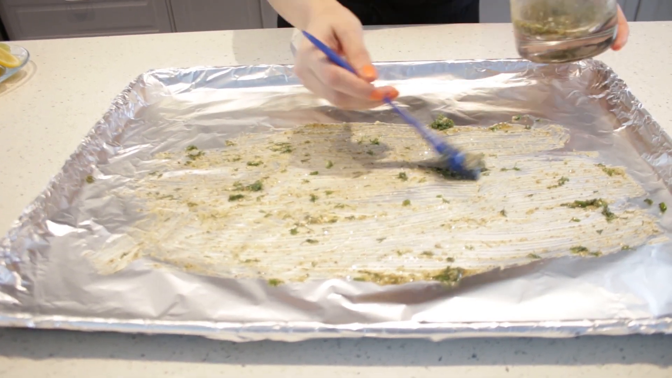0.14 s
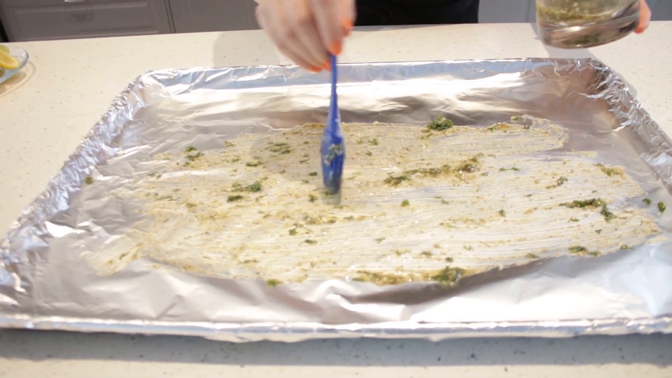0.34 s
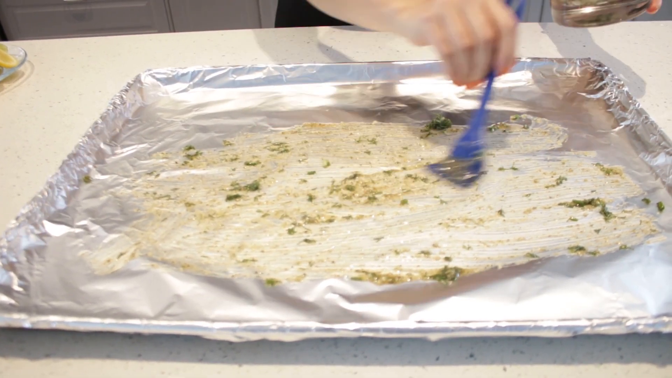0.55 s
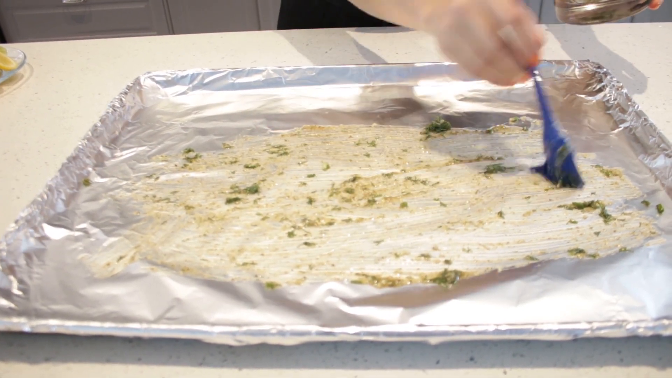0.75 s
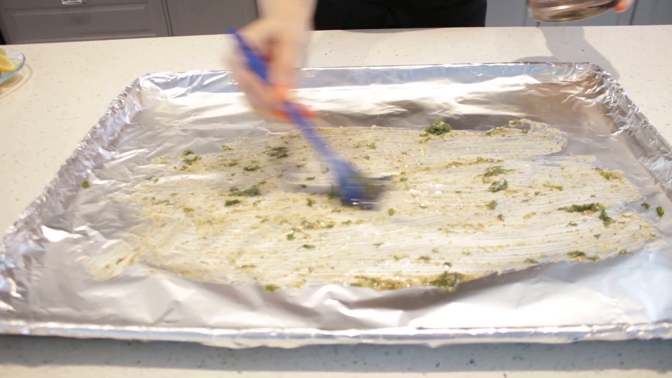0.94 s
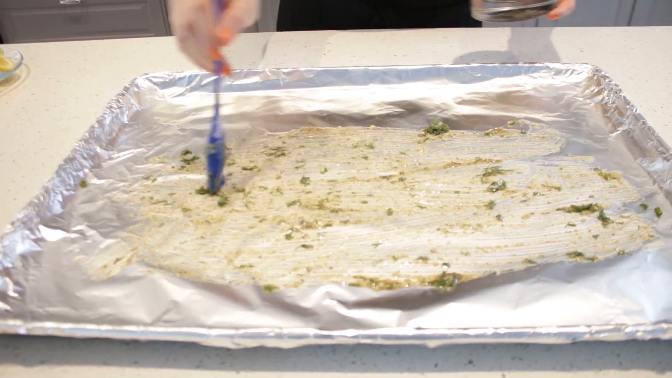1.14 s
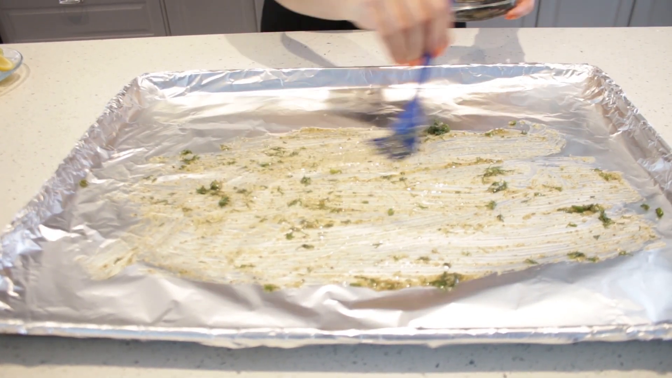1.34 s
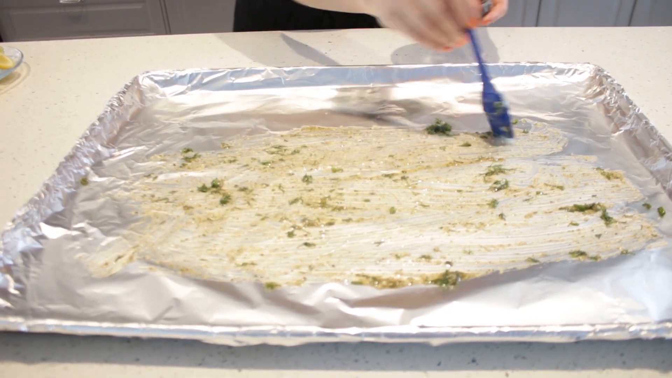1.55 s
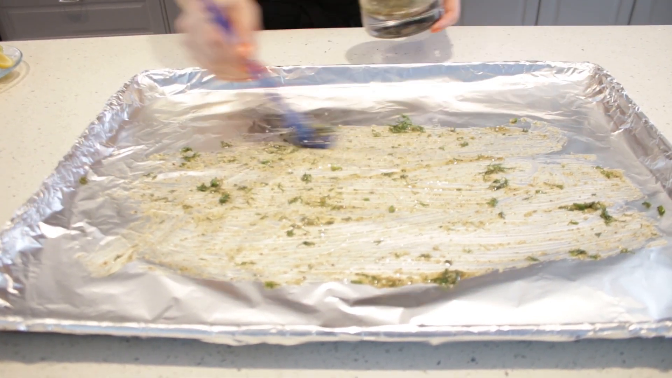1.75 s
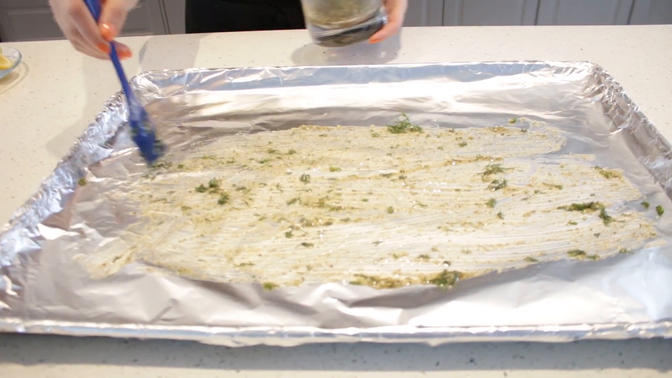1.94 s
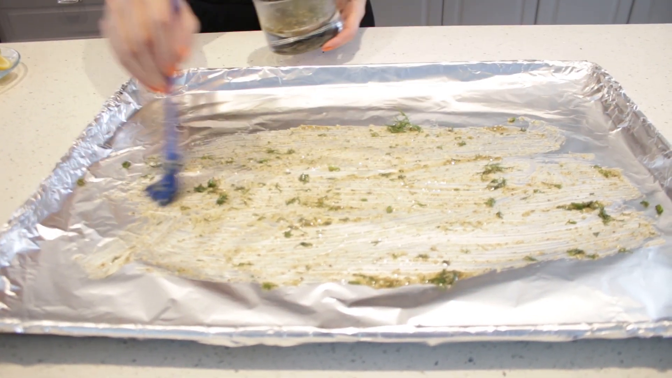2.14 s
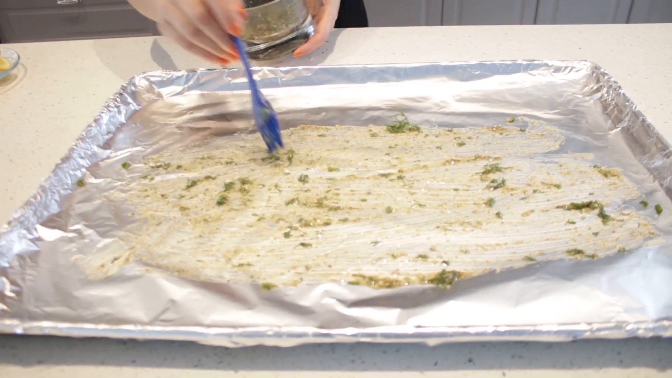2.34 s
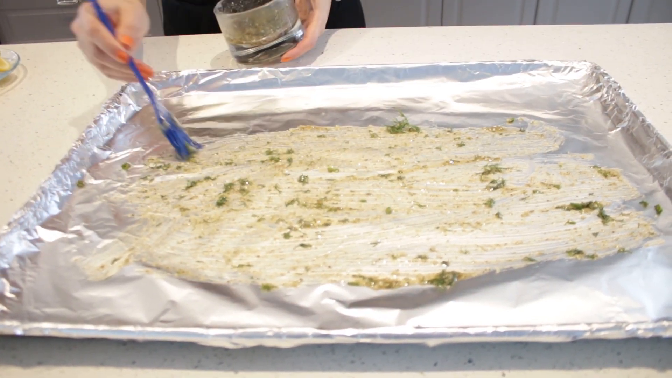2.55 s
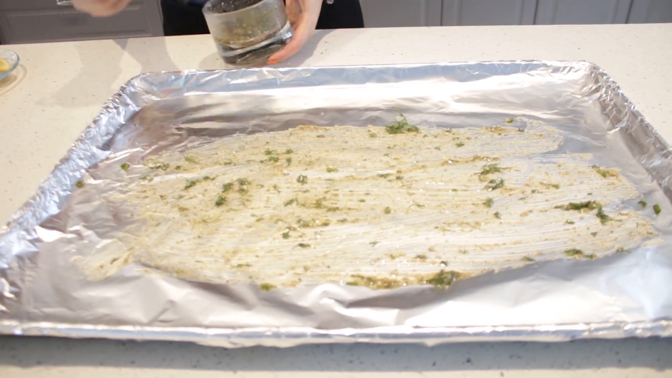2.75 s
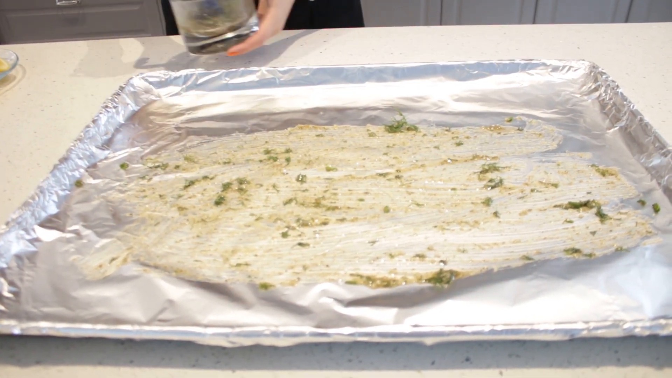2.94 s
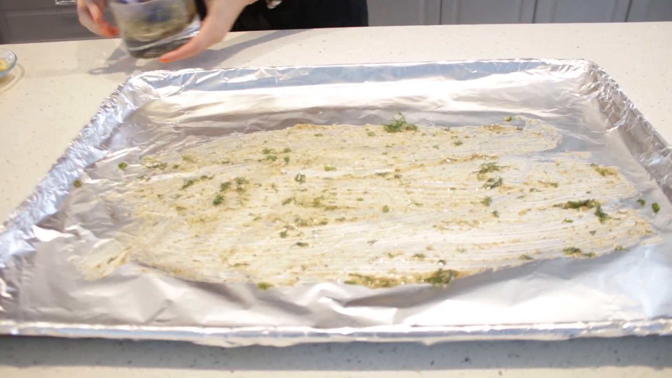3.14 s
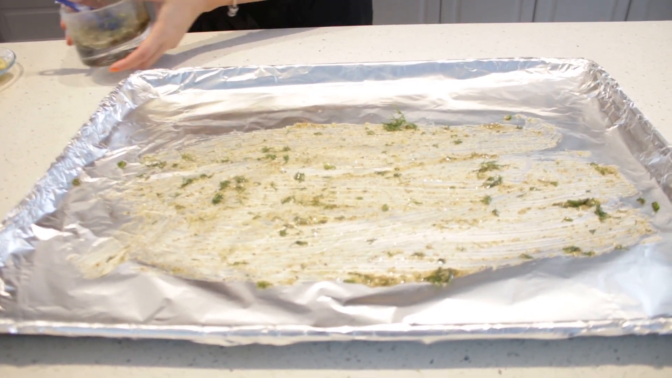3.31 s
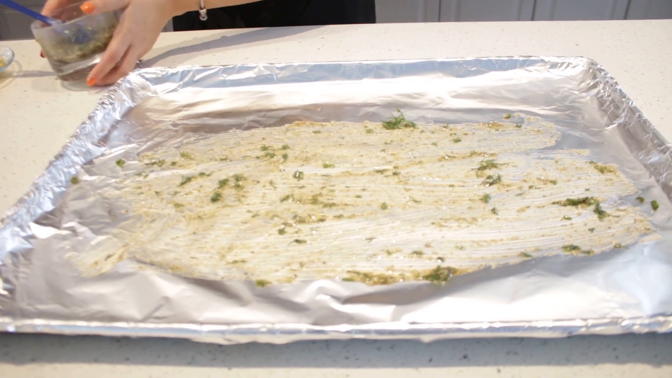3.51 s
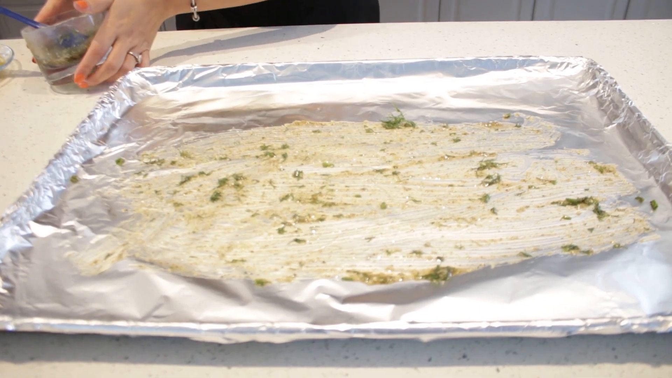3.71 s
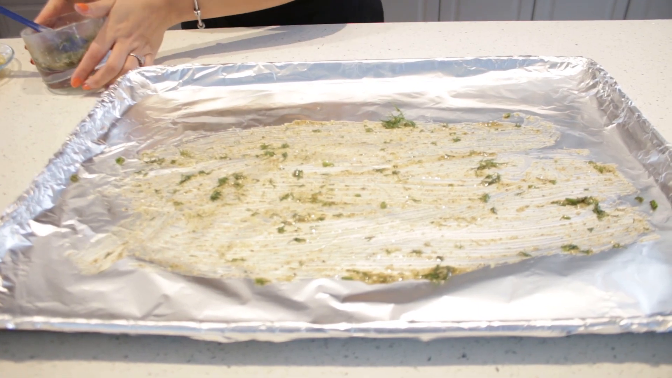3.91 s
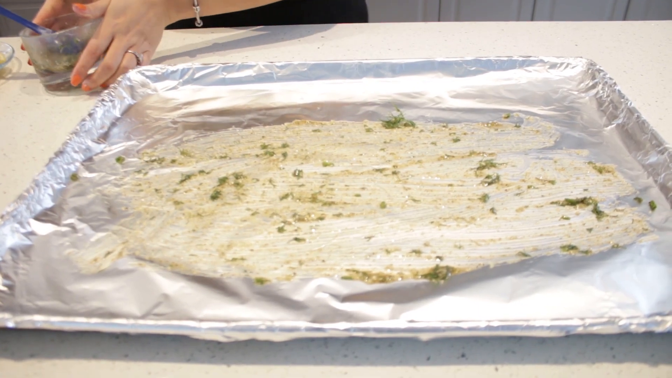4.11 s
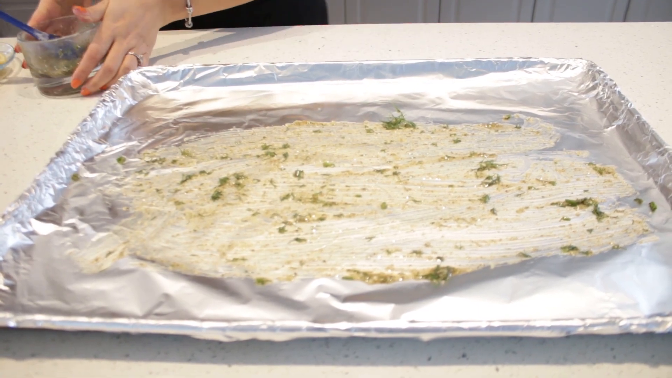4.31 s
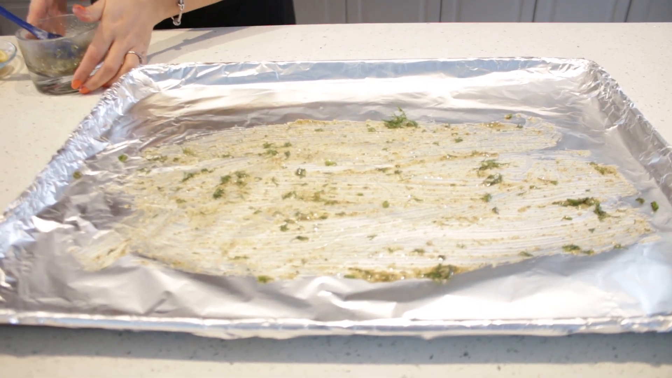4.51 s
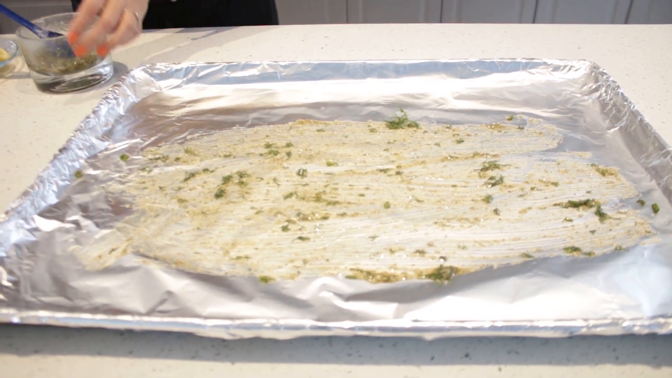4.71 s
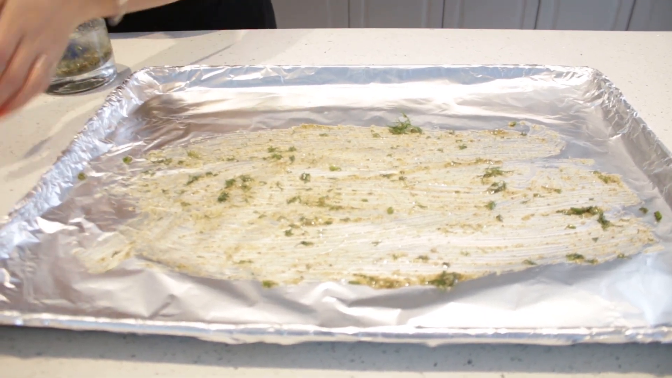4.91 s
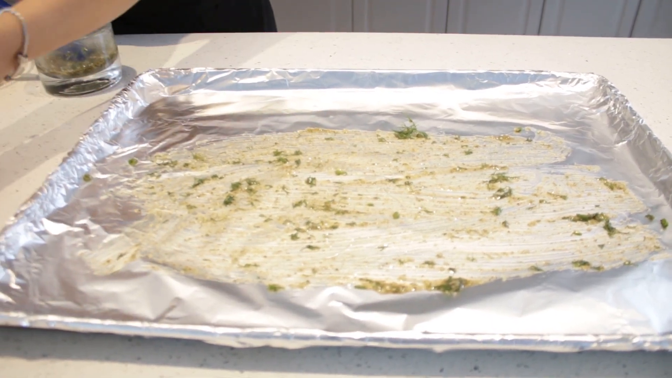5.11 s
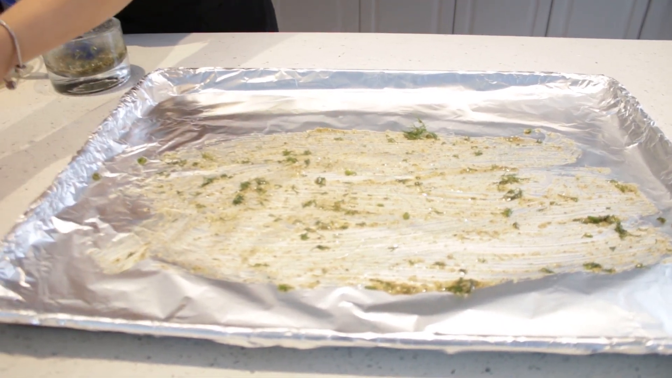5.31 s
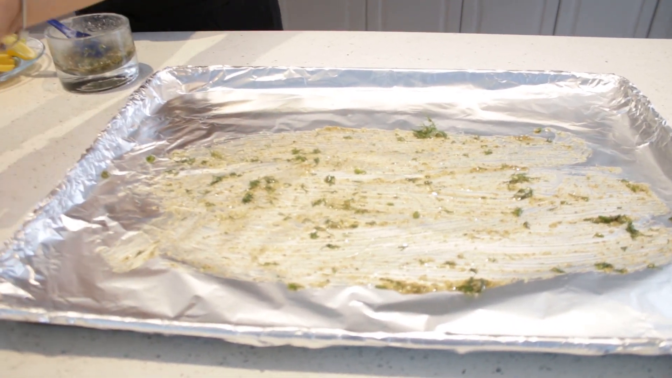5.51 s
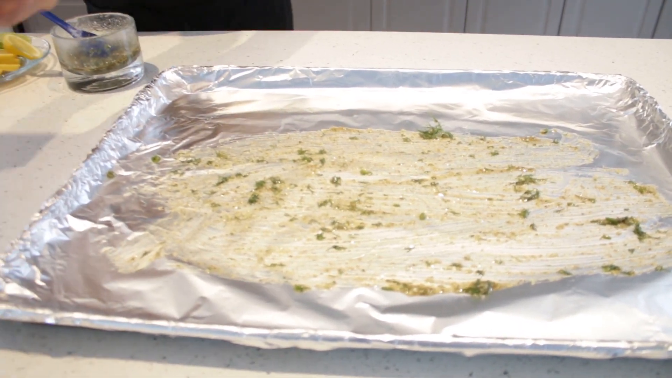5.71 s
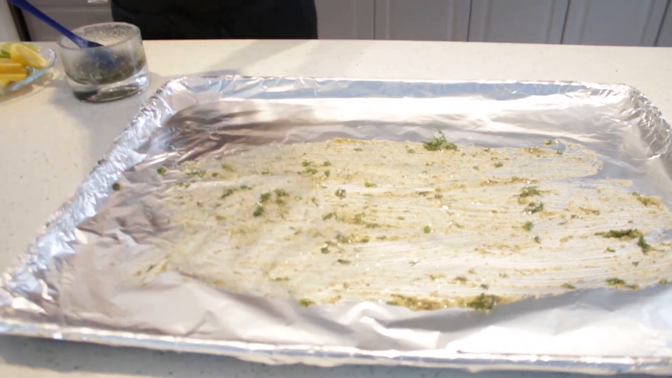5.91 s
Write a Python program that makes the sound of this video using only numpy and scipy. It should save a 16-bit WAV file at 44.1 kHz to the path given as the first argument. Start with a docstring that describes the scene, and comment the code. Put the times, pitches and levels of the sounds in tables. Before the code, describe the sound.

In a fan-filled kitchen, short crackly foil strokes give way to hard glass thuds on a counter, then small rustles and clicks.

```python
"""A fan hums in a fairly live kitchen throughout: filtered noise and wavering tones.
First a silicone brush spreads melted butter over foil on a baking sheet. Grainy noise makes the wet
hiss, short bursts make the crackling creases, and resonant filters make the sheet hum.
Then the butter glass shifts and is set on the counter, and the brush is dropped into it: thuds and ringing modes.
Last, a hand rustles and clicks at a dish beside it, and a few late foil creases settle."""
import sys
import numpy as np
from scipy import signal
from scipy.fft import rfft, irfft
from scipy.io import wavfile

SR = 44100
rng = np.random.default_rng(int(sys.argv[2]) if len(sys.argv) > 2 else 0)


def unload_audio(sound):
    """Save the sound as a 16-bit wav file, at the path given as the first command line argument."""
    columns = np.transpose(np.atleast_2d(sound))
    # keep every value between -1 and 1, then stretch to whole-number steps
    steps = np.round(np.clip(columns, -1, 1) * 32767)
    wavfile.write(sys.argv[1], SR, steps.astype(np.int16))


N = 267246  # length in samples
TIME = np.arange(N) / SR
EDGE_HZ = 15900  # the final treble limit

# Table levels are relative; some sources add a further level setting.

# Steady air noise of the fan: pitch_hz, level_db (per Hz)
AIR_SPECTRUM = [(25, -4.5), (55, -17.5), (90, -14.5), (130, -11.5), (200, -11), (340, -13), (680, -12),
                (950, -5.5), (1280, -8.5), (1450, -12), (2700, -13.5), (4000, -24.5), (7500, -32),
                (16000, -32)]
AIR_DB = -46
# Resonances of the fan duct: pitch_hz, width_hz, boost_db
FAN_DUCT = [(435.3, 12, 12.5), (490, 81, 12), (797, 280, 10.5)]
# Motor tones of the fan: pitch_hz, level_db
FAN_TONES = [(263.8, -71), (522.2, -62.5), (608.3, -74.5), (872.1, -60.5), (985.1, -68), (1044, -66),
             (1227, -58.5), (2110, -72.5)]
# How long the kitchen echoes: pitch_hz, time_to_fall_60_db_s
ROOM_DECAY = [(100, 0.34), (400, 0.5), (1000, 0.55), (2500, 0.58), (4000, 0.55), (8000, 0.29), (16000, 0.6)]

# The hand rubbing at the dish: start_s, swell_s, fade_s, level_db
DISH_RUBS = [(5.159, 0.027, 0.097, -35), (5.215, 0.092, 0.13, -40.5), (5.42, 0.12, 0.2, -52.5),
             (5.765, 0.036, 0.16, -49.5)]
# Sound of fingers rubbing: pitch_hz, level_db (per Hz)
RUB_SPECTRUM = [(200, -34), (900, -8), (1600, -2.5), (2400, 1.5), (3500, -1.5), (6000, -10), (8500, -22.5),
                (12000, -19.5), (16000, -40)]
# Light clicks at the dish: start_s, level_db, pitch_hz, decay_s, dull_bump_db (relative to the click)
DISH_CLICKS = [(5.1172, -22, 2630, 0.0009, -12), (5.1355, -17, 2980, 0.00066, -12),
               (5.1385, -19.5, 2510, 0.0016, -13), (5.227, -23, 2330, 0.0035, -33.5),
               (5.244, -11.5, 2080, 0.00064, -25), (5.266, -25, 2360, 0.0023, -33),
               (5.2817, -9.5, 2360, 0.00088, -25), (5.292, -18, 1230, 0.0012, -19),
               (5.316, -20.5, 2250, 0.00059, -9), (5.4328, -18.5, 2600, 0.00029, -3),
               (5.4574, -17, 2720, 0.00045, -8), (5.9616, -25, 2240, 0.00029, -8.5)]
# Sound of one tick: pitch_hz, level_db (per Hz)
CLICK_SPECTRUM = [(60, -51), (400, -8), (900, 10), (1500, 5.5), (2400, 11.5), (3600, 5.5), (5000, -4),
                  (8000, -22), (16000, -24)]

# The glass shifting on the counter: start_s, level_db, length_s, brightness_hz
SCUFFS = [(3.54, -45.5, 0.038, 960), (3.665, -44, 0.026, 1780), (3.763, -50.5, 0.036, 1800),
          (3.977, -44.5, 0.1, 3020), (4.121, -40.5, 0.09, 3020), (4.324, -47, 0.041, 990),
          (4.406, -54.5, 0.094, 9000)]
# Knocks of the glass: start_s, level_db, contact_hardness_hz, thud_db, weight_below_700_hz_db,
# counter_ring_db, glass_ring_db
KNOCKS = [(3.824, -6, 3400, -2, 4.5, 0.5, -47), (4.5214, -15.5, 1270, 0.5, -20.5, -30, 3),
          (4.545, -4.5, 3860, 0, -5, -12.5, 1)]
# Glass base on the counter: pitch_hz, level_db (per Hz)
THUD_SPECTRUM = [(40, -86.5), (100, -33), (180, -12.5), (280, -19.5), (420, -8.5), (600, -6.5), (950, 1.5),
                 (1450, -1.5), (1900, -2), (2600, -3.5), (3500, -10.5), (5000, -12.5), (8000, -13),
                 (16000, -32)]
# Modes of the counter under the glass: pitch_hz, level_db, time_to_fall_60_db_s
COUNTER_MODES = [(290, -28, .2), (459, -29, .25), (760, -18, .15), (880, -14, .18), (968, -12, .15),
                 (1057, -21, .18), (1258, -18, .18), (1466, -10, .11), (1650, -21, .22), (1901, -24, .25),
                 (2020, -24, .25), (2507, -24, .28), (2622, -23, .28), (4580, -25, .22), (5945, -20, .22)]
# Modes of the glass with the brush in it: pitch_hz, level_db, time_to_fall_60_db_s
GLASS_MODES = [(458, -26, .25), (848, -8, .18), (945, -20, .16), (960, -7, .035), (1693, -15, .14),
               (2403, -19, .2), (2621, -19, .2), (2914, -17, .2), (3811, -19, .36), (3903, -16, .36),
               (3978, -19, .36), (3860, -1, .04), (4010, -1, .04)]

# Brush strokes: start_s, swell_s, fade_s, friction_db, sheet_ring_db, butter_fizz_db
STROKES = [(0.201, 0.11, 0.067, -42.5, -42, -53), (0.49, 0.077, 0.06, -42, -39, -53),
           (0.55, 0.11, 0.4, -47.5, -46.5, -50.5), (0.878, 0.0087, 0.14, -35, -42, -51),
           (0.92, 0.072, 0.048, -35.5, -38, -60), (1.02, 0.054, 0.27, -42.5, -43, -65),
           (1.238, 0.068, 0.12, -32.5, -35, -62), (1.368, 0.044, 0.23, -32, -39, -48),
           (1.653, 0.17, 0.091, -26, -36, -32.5), (1.84, 0.079, 0.095, -24, -44.5, -34),
           (2.177, 0.11, 0.14, -35.5, -41, -56), (2.515, 0.017, 0.12, -34.5, -42.5, -46.5)]
# Foil under the bristles: pitch_hz, level_db (per Hz)
FOIL_SPECTRUM = [(150, -42), (500, -41), (1000, -9), (1500, -11.5), (2000, -1.5), (2500, 2), (3900, 1.5),
                 (5000, 1), (6500, -4), (8200, -13), (11500, -13.5), (14000, -21.5), (16000, -54)]
# Fizzing butter: pitch_hz, level_db (per Hz)
FIZZ_SPECTRUM = [(2000, -41), (6000, -2.5), (8500, -8), (11500, -3.5), (13500, -8), (15000, -15),
                 (16000, -4.5)]
# Resonances of the baking sheet: pitch_hz, width_hz, level_db
SHEET_MODES = [(780, 81, 4.5), (830, 49, -7), (1130, 860, -2), (540, 92, -6)]
# Largest creases giving way, under the brush or settling later: start_s, level_db, energy_decay_s
LARGE_CREASES = [(0.2676, -36.5, 0.0043), (0.309, -30.5, 0.0048), (0.5594, -29.5, 0.011),
                 (0.7463, -31.5, 0.0036), (0.971, -24, 0.0014), (0.9874, -29, 0.0019),
                 (1.087, -28.5, 0.0039), (1.1218, -24, 0.0028), (1.3082, -39, 0.0039),
                 (1.4907, -24.5, 0.0036), (1.658, -28, 0.0093), (1.699, -24.5, 0.003),
                 (1.7335, -20, 0.0054), (1.79, -19, 0.011), (1.85, -20.5, 0.01), (1.9036, -18.5, 0.0052),
                 (2.187, -34, 0.0095), (2.288, -23, 0.00087), (2.389, -33.5, 0.0012),
                 (2.4243, -32, 0.00067), (2.5176, -32.5, 0.011), (2.539, -26.5, 0.0064),
                 (5.767, -46, 0.0048), (5.8477, -34.5, 0.0015), (5.8637, -27, 0.00036)]
# The sheet rocking under the brush: start_s, level_db, energy_decay_s
SHEET_BUMPS = [(1.247, -36.5, 0.014), (1.535, -39.5, 0.0091)]
# Sound of one rock of the sheet: pitch_hz, level_db (per Hz)
BUMP_SPECTRUM = [(70, -37), (170, -12), (600, -8), (800, 2), (1300, -1), (2000, -14), (6000, -27)]

SHEET_FOLLOWS, FIZZ_FOLLOWS = 0.63, 0.72  # dB gained for each dB of brush pressure
# Small creases: how many, level relative to the friction, its spread, and energy decay
CREASES_PER_S, CREASE_DB, CREASE_SPREAD_DB, CREASE_S = 43, 0.5, 0.5, 0.0028
# Butter pops with a large crease: POP_DB relative to a crease of POP_AT_DB, POP_GROWS dB per dB of crease
POP_DB, POP_AT_DB, POP_GROWS = -6.5, -20.5, 2.73
SWELL_DB, FADE_DB = 15, 26.5  # pressure builds from the touch and eases until the lift
TOUCH_S, LIFT_S = 0.01, 0.015  # a gesture takes a moment to land and to leave


def amp(db):
    """Turns decibels into gain."""
    return 10 ** (np.asarray(db) / 20)


def unit(x):
    """Scales a sound to an average (rms) strength of 1."""
    return x / np.sqrt(np.mean(x ** 2) + 1e-20)


def read(points, hz):
    """Reads a table between its points, on a log-frequency axis."""
    point_hz, value = np.transpose(points)
    return np.interp(np.log(hz + 1), np.log(point_hz + 1), value)


def add(mix, start_s, sound):
    """Mixes a sound in at its start time."""
    part = mix[round(start_s * SR):][:len(sound)]
    part += sound[:len(part)]


def impulse(points, size=2048):
    """Makes a short response of energy 1 that starts at once and has the given spectrum."""
    hz = abs(np.fft.fftfreq(size, 1 / SR))
    log_gain = np.log(amp(read(points, hz)))
    # the Hilbert transform supplies the phase that puts the energy early
    spectrum = np.exp(np.conj(signal.hilbert(log_gain)))
    response = np.fft.ifft(spectrum).real[:size // 2]
    return response / np.linalg.norm(response)


def colour(x, points):
    """Filters a sound with the spectrum of a table."""
    return signal.oaconvolve(x, impulse(points))[:len(x)]


def lowpass(x, hz, order=2):
    """Softens what lies above a frequency."""
    return signal.sosfilt(signal.butter(order, min(hz, .45 * SR), fs=SR, output="sos"), x)


def wander(hz):
    """Makes slow random motion of rms 1, mostly below the given rate."""
    rate_hz = np.fft.rfftfreq(N, 1 / SR)
    return unit(irfft(rfft(rng.standard_normal(N)) / (1 + (rate_hz / hz) ** 4), N))


def grains(per_s, spread_db):
    """Makes random tiny snaps of uneven size, rms 1."""
    size = amp(spread_db * np.minimum(rng.exponential(1, N), 4))
    sign = rng.choice([-1, 1], N)
    happens = rng.random(N) < per_s / SR
    return unit(size * sign * happens)


def bursts(rows, points, snap):
    """Makes each event a snap followed by a quickly dying flurry of noise."""
    out, t = np.zeros(N), np.arange(4096) / SR
    noise, body = rng.standard_normal(N + len(t)), impulse(points)
    for start_s, level_db, decay_s in rows:
        fall = np.exp(-t / (2 * max(decay_s, 1e-4)))  # energy falls twice as fast as this
        flurry = noise[round(start_s * SR):][:len(t)] * fall
        flurry[0] = snap
        sound = signal.fftconvolve(flurry, body)
        sound *= np.sqrt(abs(decay_s) * SR) / np.linalg.norm(sound)
        add(out, start_s, amp(level_db) * sound)
    return out


def ringing(modes, t):
    """Sums damped modes that start together, each with a random sign."""
    return sum(amp(level_db - 60 * t / t60_s) * np.sin(2 * np.pi * hz * t) * rng.choice([-1, 1])
               for hz, level_db, t60_s in modes)


def clack(t, hz, decay_s):
    """Makes a few cycles inside a quick swell and fall whose top is 1."""
    envelope = t / decay_s * np.exp(1 - t / decay_s)
    return envelope * np.sin(2 * np.pi * hz * t)


def pressure(start_s, swell_s, fade_s):
    """Shapes one wiping gesture: touch down, press harder, ease off, lift."""
    t = TIME - start_s
    rise_db = -SWELL_DB * np.clip(1 - t / swell_s, 0, 1)
    ease_db = -FADE_DB * np.clip((t - swell_s) / fade_s, 0, 1)
    touch = np.clip(t / TOUCH_S, 0, 1)
    lift = np.clip(1 + (swell_s + fade_s - t) / LIFT_S, 0, 1)
    return amp(rise_db + ease_db) * touch * lift


def fan(air_db=-2.5, tones_db=-1, waver=0.55):
    """Passes air noise through duct resonances and adds wavering motor tones."""
    hz = np.fft.rfftfreq(N, 1 / SR)
    duct_db = sum(db / (1 + (2 * (hz - centre_hz) / width_hz) ** 2) for centre_hz, width_hz, db in FAN_DUCT)
    shape = amp(read(AIR_SPECTRUM, hz) + duct_db)
    air = unit(irfft(rfft(rng.standard_normal(N)) * shape, N))
    tones = np.zeros(N)
    for tone_hz, level_db in FAN_TONES:
        strength = amp(level_db) * np.sqrt(2) * (1 + waver * wander(hz=4.2))
        tones += strength * np.sin(2 * np.pi * tone_hz * TIME + 0.19 * wander(hz=14.0))
    return amp(AIR_DB + air_db) * air + amp(tones_db) * tones


def kitchen(x, early_db=5, early_s=0.019):
    """Adds sparse reflections, strong early ones from counter and cupboards, then a tail dying band by band."""
    taps = np.zeros(SR)
    at = np.arange(220, SR - 16, 16)  # one reflection in each 16 samples
    taps[at + rng.integers(0, 16, len(at))] = rng.choice([-1., 1.], len(at))
    hz, t, bands = signal.stft(taps, SR, nperseg=256)
    fall_db = -60 * t / read(ROOM_DECAY, hz)[:, None]
    boost_db = early_db * np.exp(-t / early_s)
    tail = signal.istft(bands * amp(fall_db + boost_db), SR)[1]
    return signal.fftconvolve(x, tail / np.linalg.norm(tail))[:N]


def dish(tick=0.7, tone=0.5, bump_hz=820, bump_s=0.0011, counter_hz=280, counter_s=0.0019,
         chatter_db=-14, chatter_s=0.0056):
    """Rubs fingers at a dish; each tap is a chattering tick, a pitched clack and a dull bump on the counter."""
    rubbing = sum(amp(level_db) * pressure(start_s, swell_s, fade_s)
                  for start_s, swell_s, fade_s, level_db in DISH_RUBS)
    out = unit(colour(grains(per_s=2300, spread_db=1.0), RUB_SPECTRUM)) * rubbing
    peak = abs(impulse(CLICK_SPECTRUM)).max()
    t = np.arange(1024) / SR
    bump = clack(t, bump_hz, bump_s) + 0.17 * clack(t, counter_hz, counter_s)
    for start_s, level_db, hz, decay_s, bump_db in DISH_CLICKS:
        contact = amp(chatter_db) * rng.standard_normal(len(t)) * np.exp(-t / chatter_s) / 2
        contact[0] = 1
        click = tick * colour(contact, CLICK_SPECTRUM) / peak
        tap = click + tone * clack(t, hz, decay_s) + amp(bump_db) * bump
        add(out, start_s, amp(level_db) * tap)
    return out


def scuffs():
    """Makes the base of the glass catch and slip on the counter as short stretches of grainy noise."""
    out = np.zeros(N)
    slips = colour(grains(per_s=1200, spread_db=4.5), THUD_SPECTRUM)
    for start_s, level_db, length_s, bright_hz in SCUFFS:
        rub = lowpass(slips, bright_hz, order=3)[round(start_s * SR):][:int(length_s * SR)]
        add(out, start_s, amp(level_db) * unit(rub) * signal.windows.tukey(len(rub), .5))
    return out


def glass(thud_s=0.0036, rattle_db=-14, rattle_s=0.058, leak_db=-26):
    """Makes short thuds with a rattle of the contents and, apart from them, the ring of counter and glass wall."""
    thuds, rings, t = np.zeros(N), np.zeros(N), np.arange(SR) / SR
    for start_s, level_db, hard_hz, thud_db, weight_db, counter_db, glass_db in KNOCKS:
        fall = np.exp(-t / thud_s) + amp(rattle_db) * np.exp(-t / rattle_s)
        contact = rng.standard_normal(SR) * fall
        contact[0] += 9  # the first hit
        thud = colour(contact, THUD_SPECTRUM)
        thud *= amp(thud_db) * np.sqrt(thud_s * SR) / np.linalg.norm(thud)
        thud = thud + (amp(weight_db) - 1) * lowpass(thud, 700, order=1)
        ring = amp(counter_db) * ringing(COUNTER_MODES, t) + amp(glass_db) * ringing(GLASS_MODES, t)
        for mix, blow in (thuds, thud), (rings, ring):
            # a softer contact excites little above its hardness
            softened = lowpass(blow, hard_hz, order=6) + amp(leak_db) * blow
            add(mix, start_s, amp(level_db) * softened)
    return thuds, rings


def creases(friction):
    """Lets small creases give way at random under the brush, louder where it rubs harder."""
    chance, size = rng.random(N), rng.standard_normal(N)
    at = np.flatnonzero((chance < CREASES_PER_S / SR) & (friction > 0))
    spread_db = CREASE_SPREAD_DB * np.clip(size[at], -2, 2)
    level_db = 20 * np.log10(friction[at]) + CREASE_DB + spread_db
    return zip(TIME[at], level_db, np.full(len(at), CREASE_S))


def brush(hiss_db=-2.5, fizz_db=0, crinkle_db=-4.0, sheet_db=-3):
    """Flicks bristles over the creases; the foil crackles and drives the sheet under it."""
    friction, ring, squeeze = np.zeros((3, N))
    for start_s, swell_s, fade_s, friction_db, ring_db, butter_db in STROKES:
        press = pressure(start_s, swell_s, fade_s)
        # overlapping strokes add as energy
        friction = np.hypot(friction, amp(friction_db) * press)
        ring = np.hypot(ring, amp(ring_db) * press ** SHEET_FOLLOWS)
        squeeze = np.hypot(squeeze, amp(butter_db) * press ** FIZZ_FOLLOWS)

    catch = amp(3.6 * wander(hz=70))  # the bristles catch and let go in clumps
    flicks = grains(per_s=4000, spread_db=4) * catch
    hiss = unit(colour(flicks, FOIL_SPECTRUM)) * amp(hiss_db) * friction

    # tiny films of butter burst between the bristles
    films = grains(per_s=1800, spread_db=5) * catch
    fizz = unit(colour(films, FIZZ_SPECTRUM)) * amp(fizz_db) * squeeze

    push = grains(per_s=700, spread_db=4)
    sheet = np.zeros(N)
    for hz, width_hz, level_db in SHEET_MODES:
        sheet += amp(level_db) * unit(signal.lfilter(*signal.iirpeak(hz, hz / width_hz, SR), push))
    no_bass = sheet - lowpass(sheet, 750, order=1)
    sheet = unit(lowpass(no_bass, hz=1440)) * amp(sheet_db) * ring

    large = amp(crinkle_db) * bursts(LARGE_CREASES, FOIL_SPECTRUM, snap=5)
    small = bursts(creases(friction), FOIL_SPECTRUM, snap=1.9)
    pops = [(start_s, POP_AT_DB + POP_DB + POP_GROWS * (level_db - POP_AT_DB), decay_s)
            for start_s, level_db, decay_s in LARGE_CREASES]
    fizz = fizz + bursts(pops, FIZZ_SPECTRUM, snap=1)
    rocking = bursts(SHEET_BUMPS, BUMP_SPECTRUM, snap=3)
    return hiss + fizz + sheet + large + small + rocking


def scene(foil_wet_db=-6, thud_wet_db=-1, ring_wet_db=-4, dish_wet_db=-6, absorb_hz=9000):
    """Places the glass farther off, so it wakes the room more; the dish is as near as the tray."""
    thuds, rings = glass()
    foil, thuds, hand = brush(), thuds + scuffs(), dish()
    send = amp(foil_wet_db) * foil + amp(thud_wet_db) * thuds
    send = send + amp(ring_wet_db) * rings + amp(dish_wet_db) * hand
    echo = kitchen(lowpass(send, absorb_hz, order=1))  # walls and air swallow the highest treble
    return (foil + thuds + rings + hand + echo + fan())[None]


def record(dry):
    """Rounds off peaks that near full level, then cuts the treble above the band limit."""
    clipped = dry / (1 + dry ** 8) ** (1 / 8)
    band_limit = signal.firwin(511, EDGE_HZ, window=("kaiser", 9), fs=SR)
    return signal.oaconvolve(clipped, band_limit[None], "same")


dry = scene()
out = record(dry)
unload_audio(out)
```